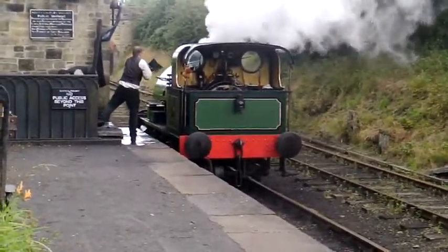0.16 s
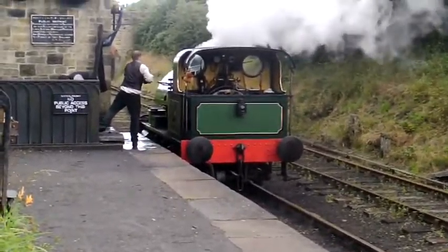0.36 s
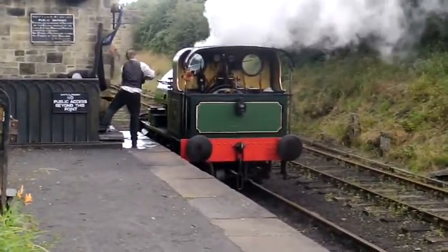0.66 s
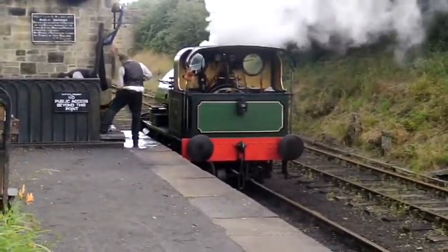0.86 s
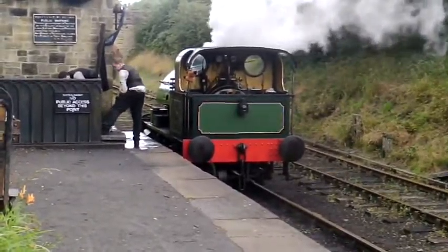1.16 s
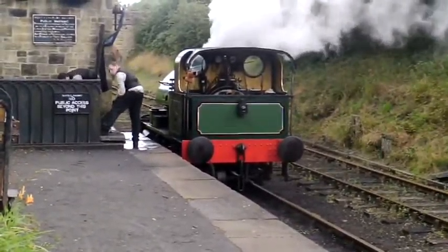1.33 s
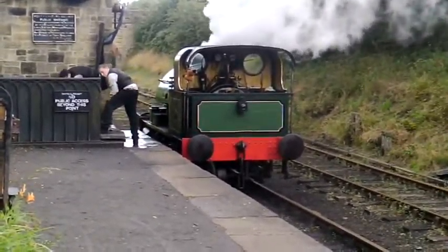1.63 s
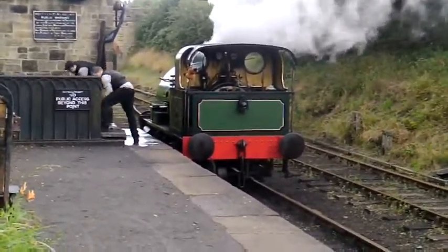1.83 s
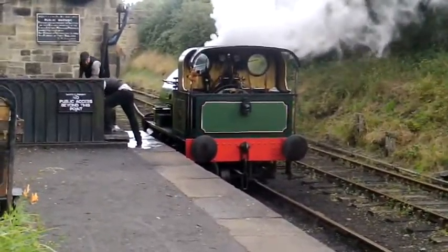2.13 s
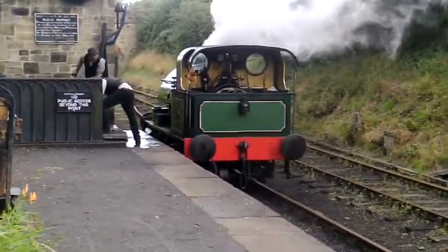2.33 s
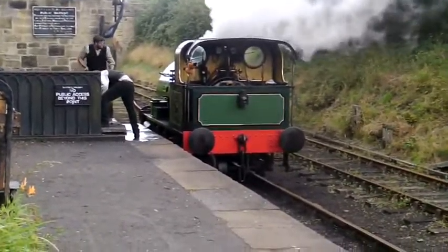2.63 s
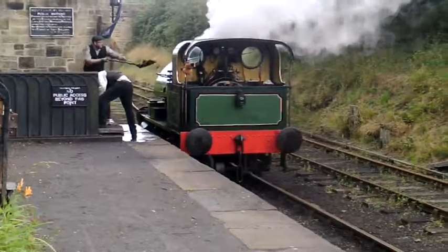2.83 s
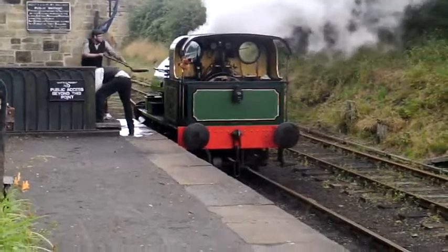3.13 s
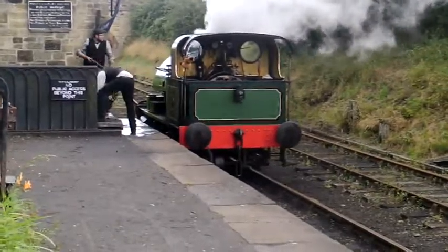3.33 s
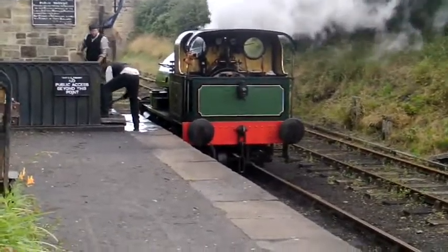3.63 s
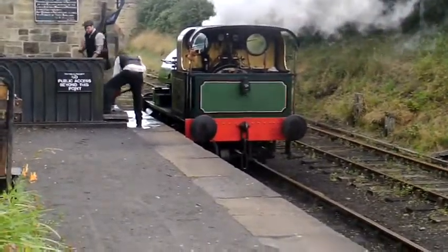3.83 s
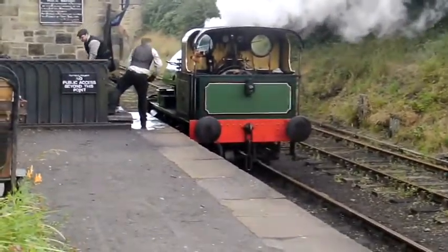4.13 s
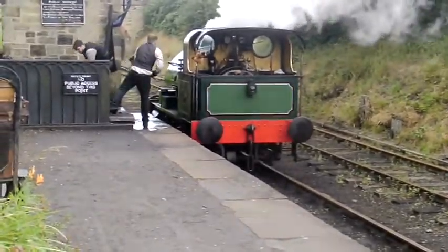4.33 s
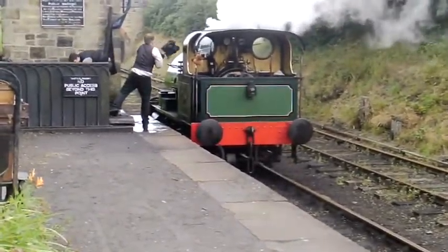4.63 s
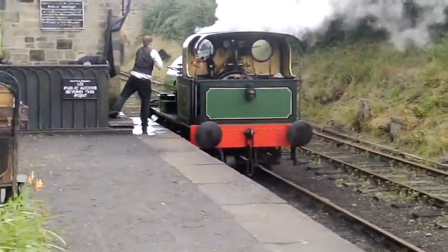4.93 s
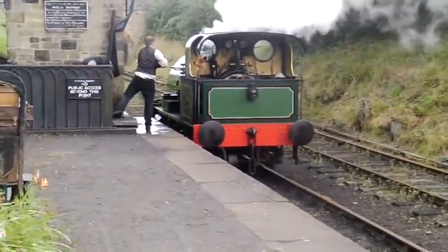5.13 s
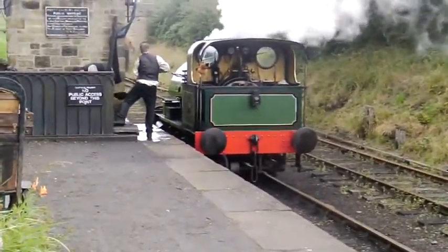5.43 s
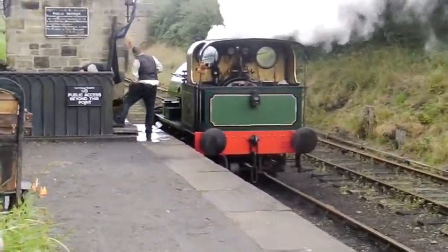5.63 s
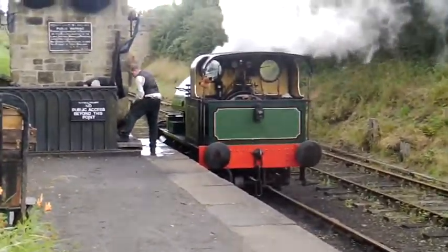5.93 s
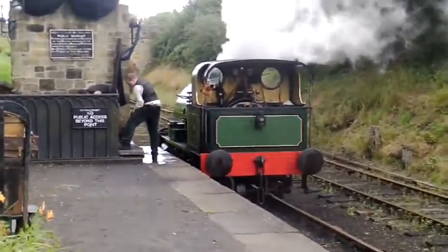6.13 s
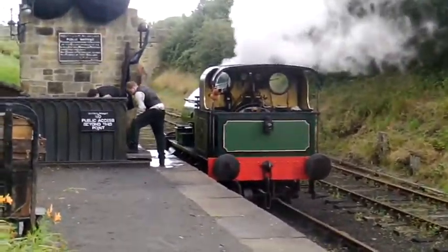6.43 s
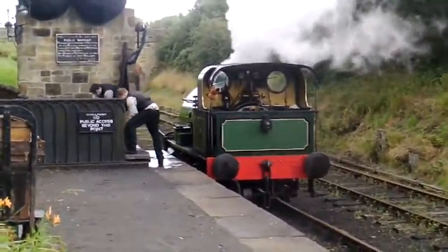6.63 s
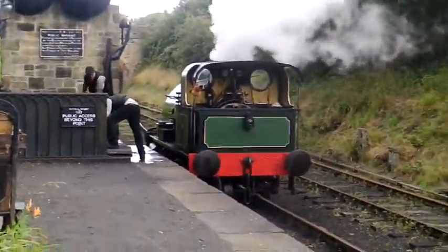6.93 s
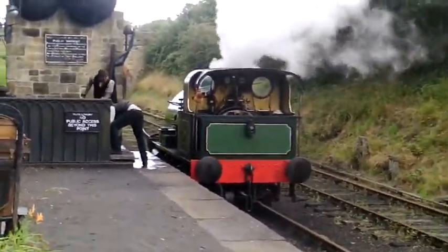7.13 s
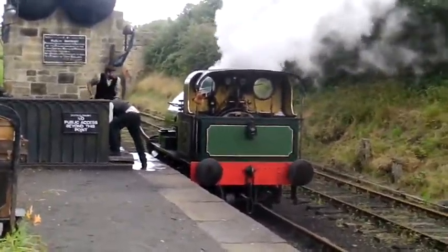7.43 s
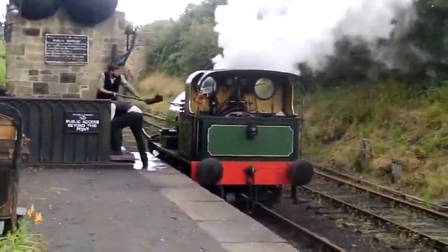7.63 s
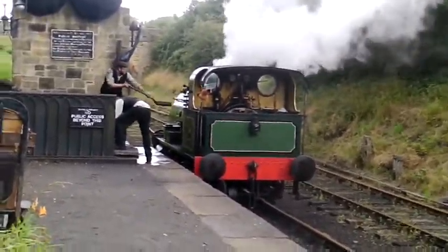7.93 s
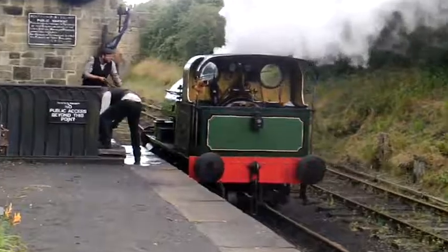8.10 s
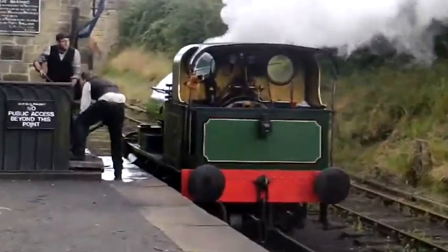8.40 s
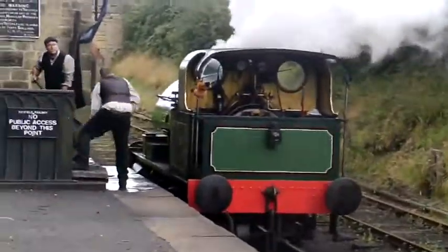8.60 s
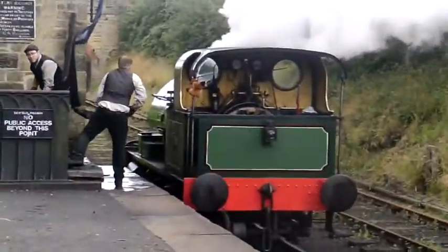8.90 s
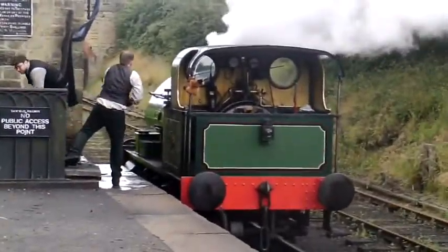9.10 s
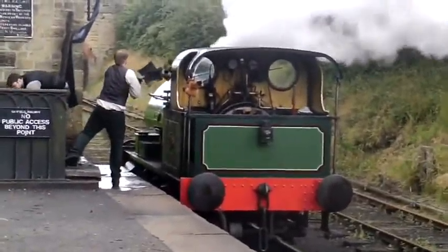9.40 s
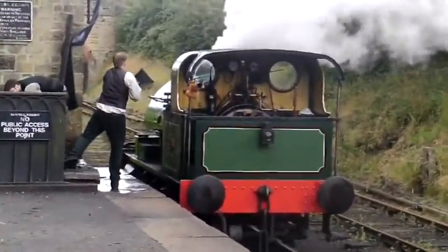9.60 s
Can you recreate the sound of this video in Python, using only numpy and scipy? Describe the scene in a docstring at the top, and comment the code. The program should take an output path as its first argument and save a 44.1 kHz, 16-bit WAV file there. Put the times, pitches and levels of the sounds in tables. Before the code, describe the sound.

A small steam locomotive stands at an outdoor platform and lets off steam. Its loud, bright hiss holds steady for the whole ten seconds, with a very high, breathy whistle flickering inside it and a slight short echo. Fire and boiling water make a faint, low rumble underneath. Shovelled coal lands in dull, soft thuds at about 0.4 and 2 seconds, three times between 3 and 3.6, a little louder near 4.2 and 5, and again around 8.2, 8.8 and 9.7. Iron squeaks briefly and thinly near 0.5, 2.3, 4.8 and 6.4 seconds. Wind rumbles on the microphone with a few short slaps from about 1 to 3.5 seconds, eases, and returns around 7.5. The strongest gust comes from 9 seconds to the end, with a quick run of slaps under the continuing hiss.

```python
"""A loud, steady hiss with a high, breathy whistle in it: a small steam locomotive stands at a platform
and lets off steam. The jet from its safety valves makes the hiss, and a ringing valve cup the whistle.
Fire and boiling water rumble underneath, and gusts of wind rumble and slap against the microphone.
Shovelled coal lands in dull thuds, and iron squeaks now and then."""
import sys
import numpy as np
from scipy import signal
from scipy.fft import rfft, irfft, next_fast_len
from scipy.io import wavfile
from scipy.ndimage import uniform_filter1d, map_coordinates

SR = 44100
rng = np.random.default_rng(int(sys.argv[2]) if len(sys.argv) > 2 else 0)


def to_wav(sig):
    """Store sig (one row per channel, or 1-D mono) as 16-bit WAV at the path in sys.argv[1].

    Samples outside -1..1 are clipped; the rate is SR.
    """
    pcm = np.clip(np.atleast_2d(sig), -1, 1) * 32767
    pcm = np.round(pcm).astype(np.int16)
    wavfile.write(sys.argv[1], SR, pcm.T)  # frames by channels


N = 430416

# How the steam jet changes: time_s, relative_level_db, brightness_db_per_octave
JET_FLOW = [(0.0, -11, 0), (2.33, -11, 0), (3.29, -10.5, 0), (4.02, -11.5, 0), (5.03, -11, 0),
            (5.08, -11.5, 0), (7.55, -12, 0), (9.1, -10.5, -0.5), (9.4, -12.5, 0.5), (9.49, -10.5, 0.5),
            (9.76, -12, -0.5)]
# Tone of the hiss, from low to high: frequency_hz, gain_db
JET_TONE = [(120, -23.5), (300, -29), (420, -25.5), (970, -18.5), (1300, -16), (1800, -11), (3000, -4.5),
            (4200, -2.5), (5000, -0.57), (6200, -4), (7300, -6), (8900, -7), (10000, -11), (12400, -19),
            (15000, -29)]
# Narrow bands that valves, cab and boiler casing boost or weaken: centre_hz, width_hz, gain_db
CASING_BANDS = [(400, 30, -3), (575, 45, 3.5), (615, 30, -4.5), (655, 30, 2.5), (745, 50, 2),
                (808, 22, 3.5), (855, 40, -2.5), (985, 90, 1.5), (1184, 38, 3), (1225, 30, -3),
                (1320, 35, -3.5), (1474, 30, 4), (1730, 45, -4), (1775, 40, 2.5), (2143, 45, 5),
                (2290, 90, -4), (3112, 50, 2.5), (3210, 70, 3.5), (3290, 70, -2.5), (3850, 100, 1.5),
                (4950, 110, 2), (5100, 120, 1.5), (5659, 90, 3), (6340, 100, 2), (7100, 120, 1.5),
                (7580, 150, 1.5), (8250, 90, 1.5)]
# How the whistle changes (lean -1 favours low notes, +1 high ones): time_s, level_db, lean
WHISTLE_CHANGES = [(0, -20, -.3), (.8, -20, -.5), (1.3, -19.5, -0.87), (1.7, -21, -.3), (2.2, -21.5, .2),
                   (3, -20.5, .2), (4, -21.5, .3), (4.9, -20, .2), (5.3, -23, .6), (6.2, -21, .3),
                   (7, -20.5, .1), (8, -21.5, .3), (8.6, -19.5, 0.68), (9.3, -22.5, 0.069),
                   (9.55, -19.5, -.7), (9.76, -23, -.9)]
# The close notes at which the valve cup rings: pitch_hz, width_hz, relative_level_db
CUP_NOTES = [(7780, 130, -6), (7970, 120, -1), (8160, 130, -1), (8290, 120, 0), (8420, 140, -1.5),
             (8650, 180, -4)]
# Echoes off cab roof, boiler and platform: delay_ms, gain
EARLY_ECHOES = [(1.572, 0.034), (2.519, 0.0077), (2.827, 0.0057), (4.088, 0.026), (6.687, 0.033),
                (10.285, 0.022), (13.36, 0.024), (16.868, .02), (17.977, 0.034), (31.3, .015),
                (35.5, 0.016)]
# Tone of the fire and boiling water: frequency_hz, gain_db
FIRE_TONE = [(30, -15), (70, -1.5), (140, -2), (200, -11.5), (260, -4.5), (380, -24), (700, -50)]
# Strength of the wind on the microphone: time_s, level_db
GUSTS = [(0, -41), (.5, -44), (1.1, -31.5), (1.6, -32), (2.1, -33.5), (2.8, -34.5), (3.5, -32.5),
         (4.3, -36.5), (4.8, -42), (5.3, -37.5), (7.2, -39.5), (7.45, -33), (7.9, -33), (8.1, -48),
         (8.98, -38), (9.1, -28), (9.5, -29), (9.76, -32)]
# Tone of the wind's deep rumble: frequency_hz, gain_db
DEEP_WIND_TONE = [(5, -9), (20, -1), (45, -5), (88, -16), (160, -27), (300, -50), (700, -80)]
# Tone of the higher rumble in hard gusts: frequency_hz, gain_db
UPPER_WIND_TONE = [(20, -22), (60, -3.5), (100, 2), (160, -8), (270, -22), (450, -45), (800, -80)]
# Thuds of coal and shovel: start_s, level_db, upper_edge_hz
COAL_THUDS = [(.42, -33, 300), (2.04, -28, 800), (3.19, -36, 500), (3.349, -32.5, 400), (3.6, -32, 600),
              (4.17, -26, 1100), (5.055, -25.5, 300), (8.15, -31.5, 300), (8.79, -32, 600),
              (9.72, -33, 1300)]
# Brief thin tones, mostly squeaking iron: start_s, length_s, start_hz, end_hz, level_db
IRON_SQUEAKS = [(2.3, 0.034, 1115, 1120, -30), (2.485, .05, 1195, 1180, -35.5),
                (6.395, .17, 1190, 1146, -35.5), (9.46, .05, 700, 730, -41), (.52, 0.305, 3190, 3240, -29),
                (4.77, .08, 4080, 4100, -22)]
# Single swirls of air that hit the microphone: peak_s, peak_db, half_width_s
AIR_SLAPS = [(.93, -25, 0.0055), (1.15, -23, .005), (1.39, -24, .012), (2.42, -18, 0.01),
             (2.73, -21, 0.009), (3.19, -23, .012), (3.37, -23, .007), (7.47, -25, .007), (7.61, -24, .004),
             (9.069, -14, 0.0043), (9.125, -15, .005), (9.239, -15, 0.0048), (9.299, -16, 0.0034),
             (9.358, -19, .003), (9.475, -16, 0.0043), (9.688, -22, .003), (9.716, -21, .004)]


def amp(db):
    """Turn decibels into a number to multiply by."""
    return 10 ** (np.asarray(db) / 20)


def unit(x):
    """Scale a sound so its average size (rms) is 1."""
    return x / np.sqrt(np.mean(x ** 2) + 1e-20)


def tone_db(tone, hz):
    """Read a tone table at any frequency, on a scale of octaves."""
    points_hz, gain_db = np.transpose(tone)
    return np.interp(np.log(hz + 1), np.log(points_hz + 1), gain_db)


def curves(rows):
    """Give each column after the time one value per sample."""
    time_s, *columns = np.transpose(rows)
    return [np.interp(np.arange(N) / SR, time_s, column) for column in columns]


def wobble(per_s):
    """A smooth curve through per_s random points a second."""
    points = rng.standard_normal(int(N * per_s / SR) + 4)
    return map_coordinates(points, [np.arange(N) * per_s / SR])


def filtered(x, response):
    """Multiply each frequency in x by response(hz)."""
    size = next_fast_len(N + SR // 2)
    return irfft(rfft(x, size) * response(np.fft.rfftfreq(size, 1 / SR)), size)[..., :N]


def shaped_noise(tone):
    """Noise that follows a tone table."""
    return unit(filtered(rng.standard_normal(N), lambda hz: amp(tone_db(tone, hz))))


def ringing_noise(pitch_hz, width_hz):
    """Noise that rings around one pitch."""
    resonance = lambda hz: 1j * hz * width_hz / (pitch_hz ** 2 - hz ** 2 + 1j * hz * width_hz)
    return unit(filtered(rng.standard_normal(N), resonance))


def steam_jet(patchy_db=0.4):
    """Rushing steam hisses; swirls in it make patches of the hiss swell and fade."""
    band_hz, t, bands = signal.stft(rng.standard_normal(N + 1024), SR, nperseg=512)
    patches = uniform_filter1d(rng.standard_normal(bands.shape), 6, axis=0)  # smooth over pitch
    patches = unit(uniform_filter1d(patches, 14, axis=1))  # and over time
    time_s, level_db, brightness = np.transpose(JET_FLOW)
    octaves = np.log2(np.clip(band_hz, 500, None) / 5000)[:, None]
    flow_db = np.interp(t, time_s, level_db) + np.interp(t, time_s, brightness) * octaves
    hiss = signal.istft(bands * amp(flow_db + patchy_db * patches), SR, nperseg=512)[1][:N]
    casing_db = lambda hz: sum(db / (1 + (2 * (hz - centre_hz) / width_hz) ** 2)
                               for centre_hz, width_hz, db in CASING_BANDS)
    hiss = filtered(hiss, lambda hz: amp(tone_db(JET_TONE, hz) + casing_db(hz)))
    return amp(7.5 + 0.36 * wobble(8)) * hiss


def valve_whistle(lean_db=5.0, flicker_db=2.5):
    """The valve cup rings at several close notes, each flickering on its own."""
    level_db, lean = curves(WHISTLE_CHANGES)
    low_to_high = np.linspace(-1, 1, len(CUP_NOTES))
    notes = [amp(db + lean_db * side * lean + flicker_db * wobble(12)) * ringing_noise(hz, width_hz)
             for side, (hz, width_hz, db) in zip(low_to_high, CUP_NOTES)]
    return amp(level_db + 0.74 * wobble(14)) * unit(sum(notes))


def station_echoes(sound, fade_s=0.34, tail_db=-14.0, tails=4):
    """The sound, its quick echoes and a short blurred tail off wall, platform and bank."""
    echoes = lambda hz: sum(gain * np.exp(-2j * np.pi * hz * ms / 1000) for ms, gain in EARLY_ECHOES)
    out = filtered(sound, lambda hz: 1 + echoes(hz))
    t = np.arange(SR // 4) / SR
    place = np.linspace(0, tails - 1, N)
    for k in range(tails):  # the hand-held microphone drifts, so one tail blends into the next
        tail = rng.standard_normal(len(t)) * amp(-60 * t / fade_s)
        tail = signal.lfilter([1], [1, -.15], tail)  # slightly duller
        blend = np.cos(np.pi / 2 * np.clip(place - k, -1, 1))
        out += amp(tail_db) * blend * signal.oaconvolve(sound, tail / np.linalg.norm(tail))[:N]
    return out


def firebox():
    """Fire and boiling water make a low, even rumble."""
    return amp(-49.5 + 1.1 * wobble(4)) * shaped_noise(FIRE_TONE)


def wind(puff_db=1.5, puffs_per_s=8, strong_db=-27, upper_growth=1.4):
    """Air breaks over the microphone in rumbling puffs; hard gusts reach higher in pitch."""
    gust_db, = curves(GUSTS)
    puffs = unit(amp(puff_db * wobble(puffs_per_s)))
    deep = unit(amp(1.6 * wobble(17)) * shaped_noise(DEEP_WIND_TONE))
    upper = unit(amp(3.5 * wobble(18)) * shaped_noise(UPPER_WIND_TONE))
    upper_db = strong_db - 14 + upper_growth * (gust_db - strong_db)  # 14 dB below a strong gust
    return amp(gust_db) * puffs * deep + amp(upper_db) * np.sqrt(puffs) * upper


def coal_thuds(rise_cycles=8, fade_cycles=136):
    """Shovelled coal lands as puffs of noise with no ring; duller thuds rise and fade more slowly."""
    out, t = np.zeros(N + SR), np.arange(SR // 2) / SR
    for start_s, db, edge_hz in COAL_THUDS:
        band = signal.butter(2, [60, edge_hz], "bandpass", fs=SR, output="sos")
        puff = unit(signal.sosfilt(band, rng.standard_normal(len(t))))
        cycles = t * edge_hz
        rise = 1 - np.exp(-cycles / rise_cycles)
        out[round(start_s * SR):][:len(t)] += amp(db - 60 * cycles / fade_cycles) * rise * puff
    return out[:N]


def iron_squeaks():
    """Iron squeaks in short sliding tones that start and stop softly."""
    out = np.zeros(N)
    for start_s, length_s, start_hz, end_hz, db in IRON_SQUEAKS:
        n = round(length_s * SR)
        phase = 2 * np.pi * np.cumsum(np.linspace(start_hz, end_hz, n)) / SR
        soft_ends = signal.windows.tukey(n, .4)
        out[round(start_s * SR):][:n] += amp(db) * np.sqrt(2) * soft_ends * np.sin(phase)
    return out[:N]


def air_slaps():
    """A swirl of air gives one sharp push between two weak recoils, inward or outward by chance."""
    out, half = np.zeros(N + SR), SR // 10
    from_peak_s = np.abs(np.arange(-half, half)) / SR
    directions = rng.choice([-1, 1], size=len(AIR_SLAPS))
    for (peak_s, db, half_width_s), direction in zip(AIR_SLAPS, directions):
        push = (1 - from_peak_s / half_width_s) * np.exp(-from_peak_s / half_width_s)
        out[round(peak_s * SR) - half:][:len(push)] += direction * amp(db) * push
    return out[:N]


def scene():
    """Add up all the sounds; one microphone feeds both channels."""
    echoing = station_echoes(steam_jet() + valve_whistle() + iron_squeaks())
    mono = echoing + coal_thuds() + wind() + air_slaps() + firebox()
    return np.array([mono, mono])


def record(dry, ceiling=1.15, offset=.0058, roll_off_hz=15050, top_hz=15725):
    """Round off the loudest peaks, shift the wave slightly off zero and cut the highest treble."""
    rounded = dry / (1 + np.abs(dry / ceiling) ** 6) ** (1 / 6) + offset
    treble_cut = lambda hz: amp(-11 * np.clip((hz - roll_off_hz) / 600, 0, None) ** 1.5) * (hz < top_hz)
    return np.clip(filtered(rounded, treble_cut), -1, 1)


dry = scene()
out = record(dry)
to_wav(out)
```